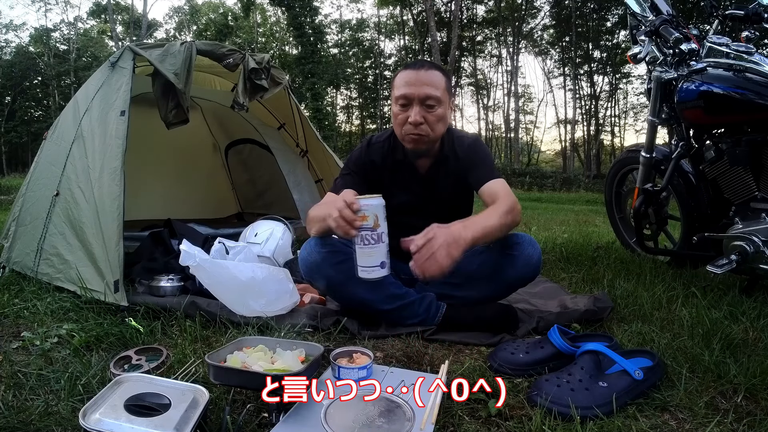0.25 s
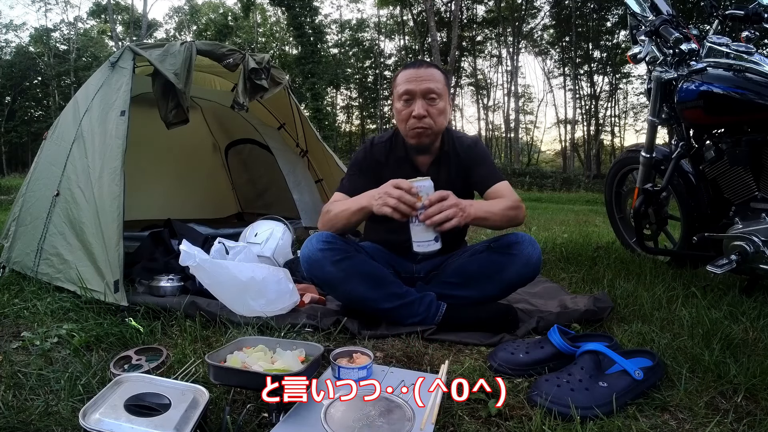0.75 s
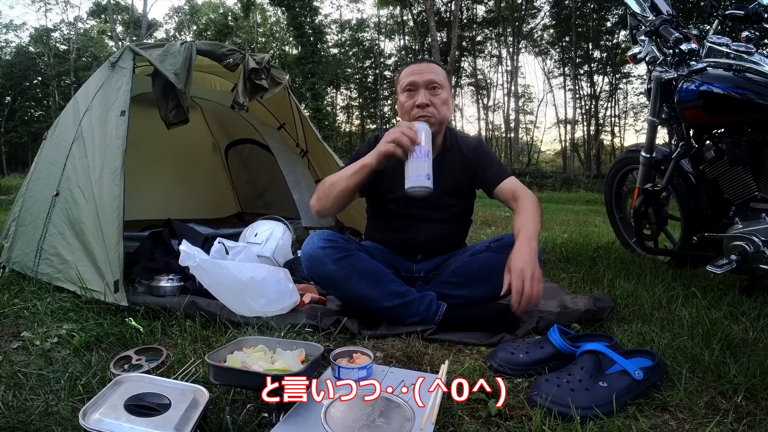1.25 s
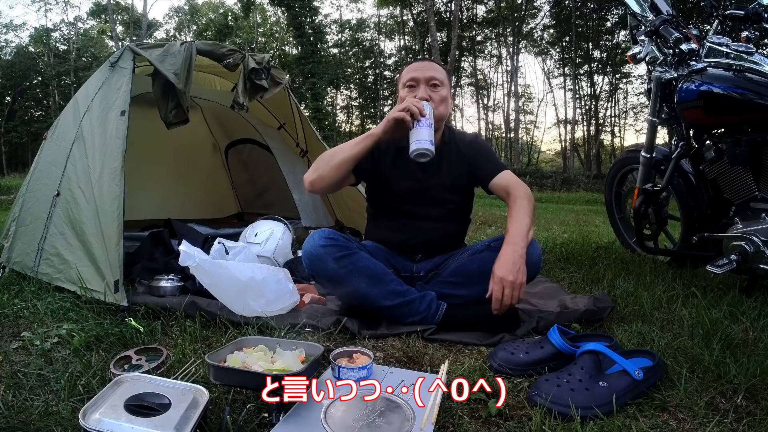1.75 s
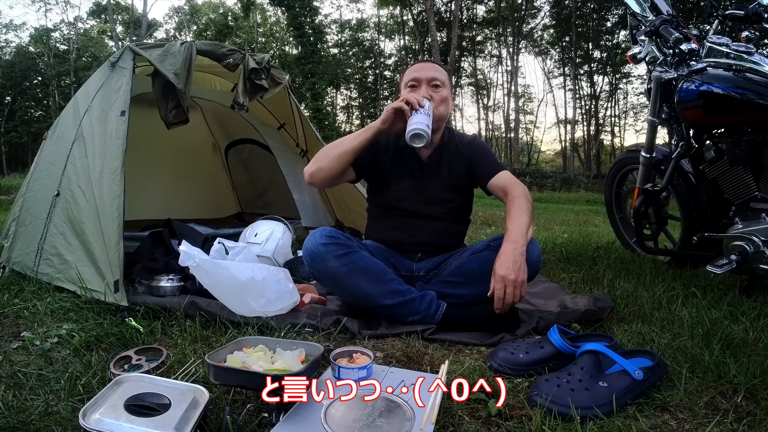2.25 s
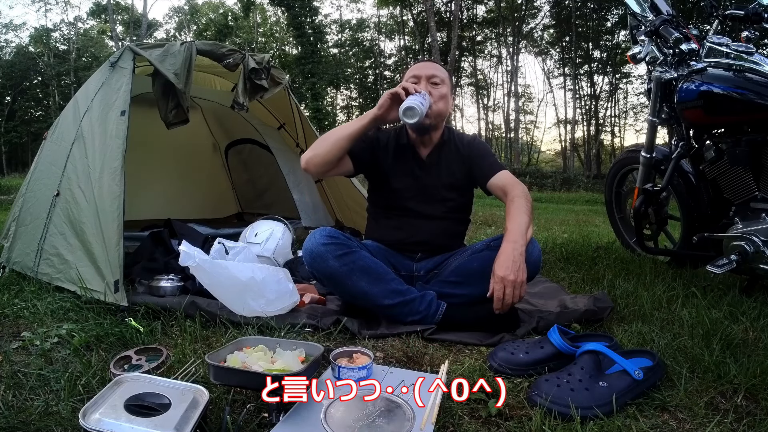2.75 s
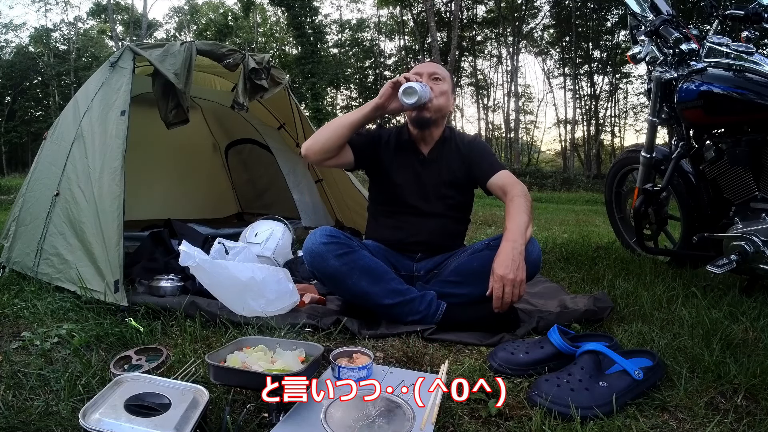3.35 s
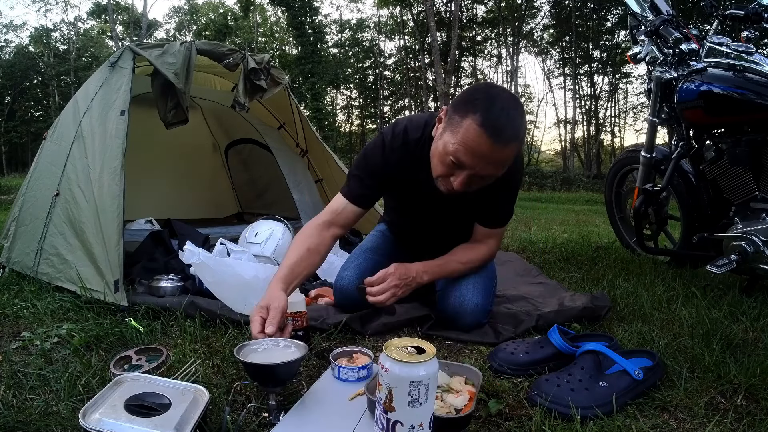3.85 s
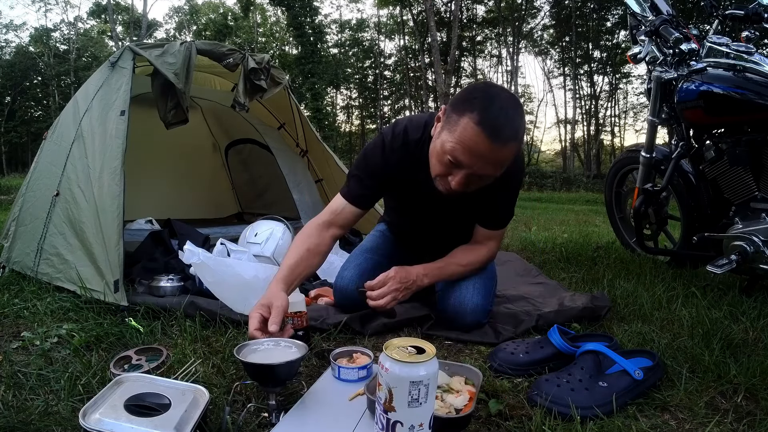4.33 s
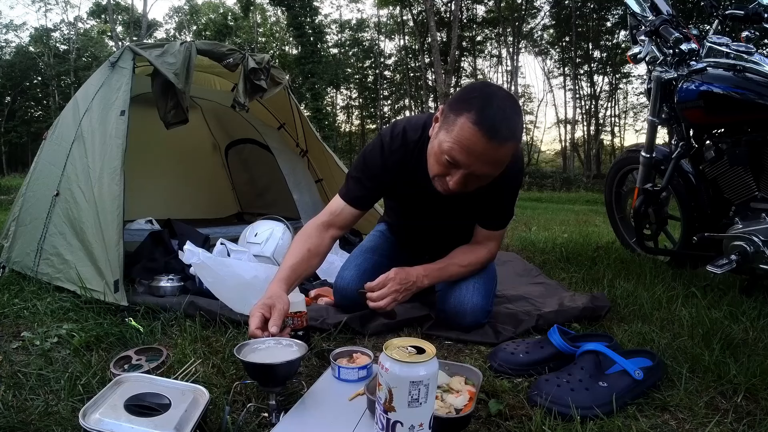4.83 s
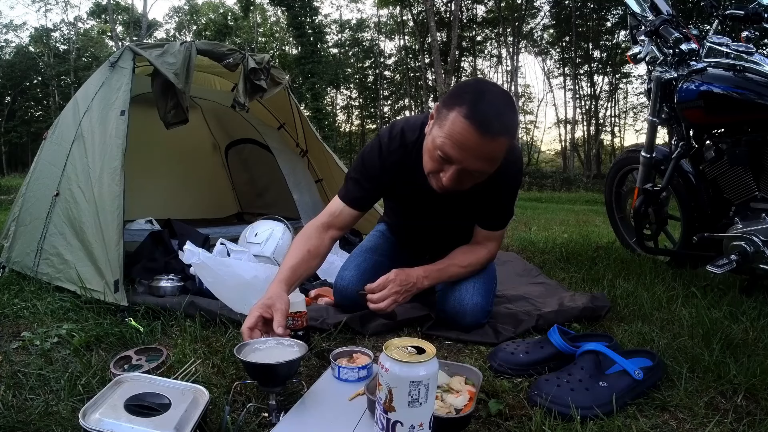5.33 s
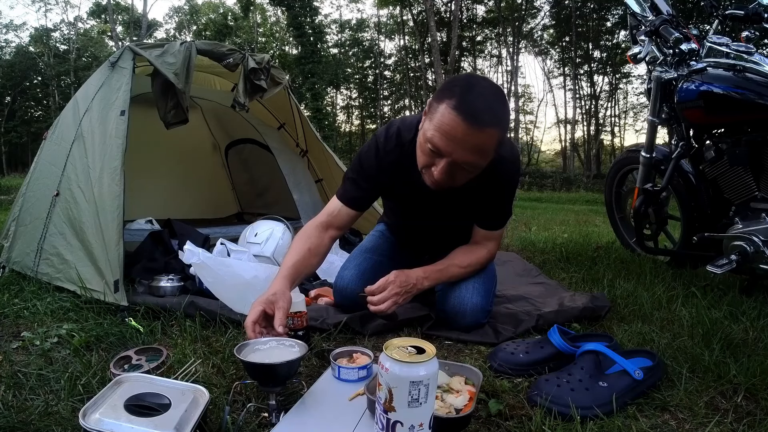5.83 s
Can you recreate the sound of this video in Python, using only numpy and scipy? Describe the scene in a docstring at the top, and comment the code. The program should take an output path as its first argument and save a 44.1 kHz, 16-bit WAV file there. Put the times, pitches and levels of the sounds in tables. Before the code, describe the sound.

A camp stove burns in open air, heard by two nearby microphones, the right one duller. First comes a dense, bright roar with irregular small cracks and short metallic pings from the pot, a brief tinny can knock and one fizzing snap. Then an abrupt cut clicks into a far quieter hiss, with low fluttering flame puffs and faint wind.

```python
"""Camping gas burner, high then low

Outdoors, a burner roars at full gas under a pot that sputters, snaps and pings; a drink can is knocked.
After a hard cut, which clicks, it hisses softly, turned down, and the low flame puffs in moving air.
Roar, hiss, cracks and puffs are shaped noise; pot and can are sums of dying sine waves.
Two sound ports hear it. The right one is shaded: dull in the treble and late.
"""
import sys
import numpy as np
from scipy import signal
from scipy.fft import rfft, irfft, next_fast_len
from scipy.io import wavfile
from scipy.ndimage import uniform_filter1d, map_coordinates

SR = 44100
rng = np.random.default_rng(int(sys.argv[2]) if len(sys.argv) > 2 else 0)


def voltage_ratio(level):
    """Linear amplitude factor for a level in decibels (scalar or array-like)."""
    return 10 ** (np.asarray(level, float) / 20)


def dump_mix(stems):
    """Bounce the given channels to the path in sys.argv[1] as a 16-bit WAV at rate SR."""
    frames = np.atleast_2d(stems).T  # one column per channel
    limited = np.clip(frames, -1, 1)  # hard clip at full scale
    pcm = np.round(limited * 32767).astype(np.int16)
    wavfile.write(sys.argv[1], SR, pcm)


N = 268216  # length in samples

# Tone colour of full gas at each port, before each range gets its own level: pitch_hz, density_db
FULL_LEFT = [(25, -97.5), (60, -94.5), (150, -95), (300, -93.5), (600, -87.5), (1000, -81.5), (2000, -83),
             (3300, -73.5), (4000, -76.5), (6000, -85), (8000, -94.5), (9000, -102.9), (9400, -116),
             (9750, -147.6), (10500, -142.9)]
FULL_RIGHT = [(25, -102), (60, -90), (150, -94.5), (300, -98.5), (600, -90.5), (1000, -83), (2000, -82),
              (3300, -76.5), (4000, -89), (6000, -101.4), (8000, -109.0), (9000, -124.5), (9700, -138.7),
              (10500, -144.9)]
# Resonances of pot and windshield at each port: pitch_hz, width_hz, height_db
FULL_LEFT_PEAKS = [(347, 310, 19), (760, 134, 13.5), (1120, 290, 6.5), (1470, 94, 8), (1940, 210, 9),
                   (2880, 830, 0.5), (3060, 63, 4), (3420, 190, -7), (5120, 800, 6), (6850, 2000, 7),
                   (7480, 360, 2.5)]
FULL_RIGHT_PEAKS = [(347, 260, 15), (744, 230, 15.5), (1055, 180, 6.5), (1366, 230, 6), (1830, 310, 7),
                    (2884, 1130, 8), (3130, 57, 2), (3260, 400, -2), (4980, 700, 14.5), (6500, 240, 7.5),
                    (8200, 75, 3)]
# Gap between the rumble and the pot resonance: pitch_hz, width_hz, height_db
FULL_DIP = [(550, 120, -13)]
# How alike the two ports sound: pitch_hz, likeness_0_to_1
FULL_ALIKE = [(40, 0.5), (120, 0.63), (300, 0.94), (480, 0.7), (750, 0.91), (1600, 0.95), (2300, 0.6),
              (3000, 0.87), (3700, 0.58), (4000, 0.37), (5000, 0.4), (5600, 0.9), (6500, 0.4), (7600, 0.8)]
# How far the left port leads: pitch_hz, lead_radians
FULL_LEAD = [(100, 0), (700, .15), (1290, .45), (2150, 1.1), (2670, 1.6), (3360, 2.6), (3800, 2.9),
             (4700, 3.1), (5300, 4.5), (5800, 8.7), (7000, 9.3)]
# Depth of the loud and soft patches heard at the left port, then at the right: pitch_hz, depth_db
FULL_PATCHES = [(60, 3), (350, 2.5), (550, 4), (700, 1.4), (7000, 1.6), (9000, 6)], [(60, 3), (350, 2.5),
                (550, 4), (700, 1.4), (3600, 1.5), (4500, 3.5), (6500, 7)]
# Borders between wind, rumble and jet: pitch_hz
FULL_SPLITS = [120, 480]
# Level of the flame's rumble: time_s, level_db
FULL_RUMBLE = [(0, -62.5), (.2, -62), (.3, -55), (.45, -57.5), (.52, -60), (.6, -51), (.95, -54),
               (1.1, -61), (1.28, -58), (1.4, -53), (1.64, -54), (1.73, -62), (1.82, -53), (2.02, -57),
               (2.3, -61.5), (2.45, -54), (2.75, -53), (2.9, -51), (3.25, -60.5), (3.45, -55.5),
               (3.78, -53.5)]


def full_gas():
    """A strong jet roars as noise; the cracks of the sputters pass through the same resonances."""
    jet = rng.standard_normal((2, N)) + voltage_ratio(-10.0) * sizzle(rate=82, spread_db=-1.0, decay_s=0.0052)
    cracks, rings = sputters()
    source = unit(jet) + cracks
    left = FULL_LEFT, FULL_LEFT_PEAKS + FULL_DIP
    right = FULL_RIGHT, FULL_RIGHT_PEAKS + FULL_DIP
    heard = patchy(ports(source, left, right, FULL_ALIKE, FULL_LEAD), FULL_PATCHES, size=(3, 6))
    rumble_db = waver(*curves(FULL_RUMBLE), depth_db=1.5)
    # the valve holds the jet nearly steady; it grows by 0.3 dB per second
    jet_db = waver(-38.2 + 0.3 * np.arange(N) / SR, depth_db=0.25)
    roar = set_levels(heard, [wind_db(), rumble_db, jet_db], FULL_SPLITS)
    return roar + filtered(rings, lambda hz: above(hz, 460))


# Sputters in the pot: crack peaks over the plain jet noise before its colour, and rings before their
# low cut: start_s, dull_crack_db, bright_crack_db, deep_ring_db, high_ring_db
SPUTTERS = [(.224, -3, -2, -56, -33.5), (.261, -0.5, -1.5, -52, -29), (.379, 7, 13.5, -60, -29),
            (.483, 10.5, -7, -65, -34), (.568, 4, 13, -60, -60), (.688, 6, 15.5, -60, -44),
            (.867, 6.5, 7.5, -40, -33), (1.0, 3, 3, -54, -59), (1.14, 6, 14, -55, -32),
            (1.332, 3, 3, -55, -45), (1.357, 3.5, 6, -51, -44), (1.374, -2.5, 0, -64, -32),
            (1.436, -9, -7.5, -55, -48), (1.592, -1, -13, -56, -31), (1.755, 7.5, -4, -64, -30.5),
            (1.792, -1.5, 4, -62, -31), (1.841, 4.5, 3, -71, -40), (1.986, -6, -9.5, -58, -49),
            (2.003, 6, -8.5, -62, -30.5), (2.115, -13, -5.5, -48.5, -30), (2.425, 4.5, -2, -57, -55),
            (2.606, -3, -3.5, -57, -35.5), (2.695, 0, -10, -66, -38), (2.84, 1, 3, -60.5, -32.5),
            (2.957, -2, -0.5, -60, -33), (3.071, -8, 0.5, -63, -37), (3.087, 10.5, -2.5, -53, -35),
            (3.202, -3.5, -3, -55, -32), (3.2207, 7, -1, -50, -23.5), (3.445, -5, -8, -55, -38),
            (3.502, -4, -3.5, -58, -30.5), (3.762, -10, -4.5, -56, -37)]
# The dull and the bright part of a crack: pitch_hz, sharpness (no unit), decay_s
CRACKS = [(1750, 2, .0016), (5000, 1.8, .0026)]
# Deep and high ring of the pot: pitch_hz, time_to_fall_60_db_s
POT = [(519, 0.17), (755, 0.065)]


def sputters():
    """Each sputter is a dull and a bright crack of noise, and it sets two tones of the pot ringing."""
    cracks = np.zeros((2, N + SR))  # spare room for the last tails
    rings = np.zeros(N + SR)
    for start_s, dull_db, bright_db, deep_db, high_db in SPUTTERS:
        at = round(start_s * SR)
        for (hz, sharpness, decay_s), db in zip(CRACKS, (dull_db, bright_db)):
            crack = voltage_ratio(db) * burst(decay_s, hz, sharpness)
            cracks[:, at:at + crack.shape[1]] += crack
        for (hz, t60), db in zip(POT, (deep_db, high_db)):
            rings[at:at + SR // 5] += ring(hz, db, t60, attack_s=0.00046)
    return cracks[:, :N], rings[:N]


def burst(decay_s, centre_hz, sharpness):
    """A crack: fading noise sent through a narrow resonance, scaled to peak 1."""
    t = np.arange(SR // 20) / SR
    noise = rng.standard_normal((2, len(t))) * np.exp(-t / decay_s)
    noise[0, 0] = 2.5  # sharp front in the source that both ports share
    crack = signal.lfilter(*signal.iirpeak(centre_hz, sharpness, SR), noise)
    return crack / np.abs(crack).max()


def sizzle(rate, spread_db, decay_s):
    """Countless small bubbles (rate per second): each lifts the noise briefly, by differing amounts."""
    strength = voltage_ratio(spread_db * np.minimum(rng.exponential(size=N), 2.5))
    starts = (rng.random(N) < rate / SR) * strength
    fade = np.exp(-2 * np.arange(SR // 20) / SR / decay_s)  # fade of the power
    swell = signal.fftconvolve(starts ** 2, fade)[:N]
    return unit(np.sqrt(np.abs(swell)) * rng.standard_normal((2, N)))


# Tone colour of low gas at each port, before each range gets its own level: pitch_hz, density_db
LOW_LEFT = [(25, -100.4), (60, -88.5), (150, -99.5), (300, -100.3), (600, -100.7), (1000, -94.5),
            (2000, -92), (3300, -99.5), (4000, -97.5), (6000, -100.5), (8000, -101.7), (9000, -124.3),
            (9400, -134), (9750, -151.5), (10500, -142.8)]
LOW_RIGHT = [(25, -101), (60, -93.5), (150, -94), (300, -106.5), (600, -99.4), (1000, -96), (2000, -84),
             (3300, -88.5), (4000, -103.4), (6000, -102.5), (8000, -122.0), (9000, -116.8), (9700, -135.8),
             (10500, -143.3)]
# Resonances at each port with the gas turned down: pitch_hz, width_hz, height_db
LOW_LEFT_PEAKS = [(341, 240, 13), (1030, 150, 2.1), (1480, 136, 12.4), (1794, 71, 11), (2280, 87, 9.1),
                  (2650, 97, 4.2), (3030, 760, 8), (3617, 255, 14), (4000, 130, 8), (4830, 300, 7.3),
                  (5040, 98, 12.5), (5130, 85, -2), (5530, 160, 5.9), (6310, 170, 9), (7310, 930, 14),
                  (7600, 260, 2.5), (7950, 200, -4.5), (8640, 630, 17)]
LOW_RIGHT_PEAKS = [(340, 166, 11), (1063, 56, 7.8), (1414, 165, 10), (1850, 390, 5.9), (2550, 360, 7.1),
                   (2960, 480, 10.8), (3544, 43, 15), (4680, 240, 7), (5340, 150, 5.7), (5300, 170, 2.0),
                   (7415, 750, 5.2), (7800, 90, 13)]
# Gap between the rumble and the murmur: pitch_hz, width_hz, height_db
LOW_DIP = [(700, 400, -3)]
# How alike the two ports sound: pitch_hz, likeness_0_to_1
LOW_ALIKE = [(40, 0.35), (280, 0.91), (1300, 0.7), (2300, 0.22), (3300, 0.26), (4200, 0.027)]
# How far the left port leads: pitch_hz, lead_radians
LOW_LEAD = [(100, 0), (1200, -.1), (2100, .4), (2700, .9), (3800, 2.1)]
# Depth of the loud and soft patches heard at the left port, then at the right: pitch_hz, depth_db
LOW_PATCHES = [(100, 3), (400, 3), (700, .6), (1100, 2.5), (2000, 3), (4300, 2.8), (5000, 2), (6000, 3.4),
               (7500, 1.5), (9000, 5)], [(100, 3), (400, 2.5), (700, .6), (1100, 3), (1500, 2), (3000, 2),
               (5200, 2.4), (6500, 2), (8000, 6)]
# Borders between wind, rumble, floor, murmur, jet, treble and top: pitch_hz
LOW_SPLITS = [120, 560, 960, 1250, 3850, 6800]
# Level of the flame's rumble: time_s, level_db
LOW_RUMBLE = [(3.8, -56), (4.04, -61.5), (4.2, -69.5), (4.6, -61), (5.0, -62.5), (5.3, -62.5),
              (6.08, -62.5)]
# Level of the murmur under the pot and of the jet's treble: time_s, murmur_db, treble_db
LOW_DRIFT = [(3.8, -65, -57), (3.95, -67, -59.5), (4.12, -71, -61.5), (4.2, -70, -65), (4.35, -65, -60),
             (4.5, -68, -64.5), (4.62, -64, -60.5), (4.76, -62, -60.5), (4.85, -74, -62),
             (4.95, -58, -62.5), (5.13, -70, -60.5), (5.35, -63, -60.5), (5.55, -68.5, -59.5),
             (5.68, -68, -60.5), (5.76, -67, -62.5), (5.92, -63, -62), (6.08, -63, -61.5)]


def low_gas():
    """A thin steady jet hisses as noise; long narrow loud and soft patches are heard in it."""
    jet = rng.standard_normal((2, N)) + voltage_ratio(-9.5) * sizzle(rate=71, spread_db=-6.5, decay_s=0.0098)
    left = LOW_LEFT, LOW_LEFT_PEAKS + LOW_DIP
    right = LOW_RIGHT, LOW_RIGHT_PEAKS + LOW_DIP
    heard = patchy(ports(jet, left, right, LOW_ALIKE, LOW_LEAD), LOW_PATCHES, size=(3, 14))
    calmer_wind_db = wind_db() - 1
    rumble_db = waver(*curves(LOW_RUMBLE), depth_db=1)
    murmur_db, treble_db = curves(LOW_DRIFT)
    murmur_db = waver(murmur_db, depth_db=1)
    jet_db = waver(-50, depth_db=0.37)
    treble_db = waver(treble_db, depth_db=1)
    floor_db, top_db = -72, -62  # steady ranges under the murmur and over the treble
    levels_db = [calmer_wind_db, rumble_db, floor_db, murmur_db, jet_db, treble_db, top_db]
    return set_levels(heard, levels_db, LOW_SPLITS) + puffs()


# Puffs of the low flame; the peak lies midway between the ports:
# start_s, peak_db, first_pitch_hz, last_pitch_hz, left_over_right_db, length_s
PUFFS = [(4.091, -56, 253, 250, 5, 0.036), (4.511, -55, 347, 372, 2, 0.044),
         (4.592, -50.5, 300, 257, 9, 0.045), (4.755, -46, 140, 115, 11, .06), (4.73, -54, 360, 440, 5, .09),
         (4.91, -46, 380, 300, 3.5, 0.08), (5.035, -54, 220.5, 178, 5, 0.072),
         (5.02, -57, 503, 440, 11, 0.057), (5.165, -52.5, 476, 369, -7, 0.086),
         (5.35, -49, 280, 390, 6.5, 0.11), (4.973, -50.5, 250, 220, 6, 0.04),
         (5.539, -52, 398, 363, 7, 0.069), (5.57, -46, 130, 150, 7, .08), (5.57, -47, 260, 220, 7, .08),
         (5.575, -48, 200, 180, 7, .07), (5.702, -50, 330, 234, 8, 0.088),
         (5.789, -55, 310, 209, 12, 0.073), (5.8, -59, 437, 587, 13, 0.075),
         (5.939, -52.5, 398, 390, 9, 0.11)]


def puffs():
    """Moving air makes the flame puff: a soft swell of narrow noise and hum whose pitch slides."""
    out = np.zeros((2, N))
    t = np.arange(-SR // 4, SR // 4) / SR  # zero at the middle of the puff
    for start_s, db, first_hz, last_hz, pan_db, length in PUFFS:
        band_hz = 0.35 * (first_hz + last_hz) / 2
        span = int(SR / band_hz)
        slow = uniform_filter1d(rng.standard_normal((2, len(t))), span)
        a, b = unit(uniform_filter1d(slow, span // 2))
        hz = np.interp(t, [-length / 2, length / 2], [first_hz, last_hz])
        turn = 2 * np.pi * np.cumsum(hz) / SR
        hum = 1.1  # steady tone beside noise of rms 1
        puff = (a + hum) * np.cos(turn) + b * np.sin(turn)
        puff = puff * np.exp(-(2 * t / length) ** 2)
        puff = puff / np.abs(puff).max()
        gains = voltage_ratio(db + pan_db * np.array([[.5], [-.5]]))
        at = round((start_s + length / 2) * SR) - SR // 4
        out[:, at:at + len(t)] += (gains * puff)[:, :N - at]
    return out


# Tick of the snap, levels over the snap's own level: pitch_hz, level_db, time_to_fall_60_db_s
SNAP_TICK = [(1150, 6, .01), (1900, 9, .008), (4600, 5, .009)]


def snap():
    """A drop bursts on hot metal: a bright fizz swells into a short dull tick."""
    peak_s, snap_db = 2.2905, -27
    pitch_hz, width_hz, rise_s, fall_s = 5500, 3800, .0016, .0028
    t = np.arange(N) / SR - peak_s
    band = lambda hz: np.exp(-(2 * (hz - pitch_hz) / width_hz) ** 2)
    fizz = voltage_ratio(snap_db) * unit(filtered(rng.standard_normal(N), band))
    fizz = fizz * np.exp(-np.abs(t) / np.where(t < 0, rise_s, fall_s))
    tick = np.zeros(N)
    at = round((peak_s - rise_s / 2) * SR)
    tick[at:at + SR // 5] = sum(ring(hz, snap_db + db, t60, attack_s=.0006) for hz, db, t60 in SNAP_TICK)
    return fizz * voltage_ratio(np.array([[4], [-8]])) + tick  # the shaded port hears little of the fizz


# Tones of the can, levels over the knock's own level: pitch_hz, level_db, time_to_fall_60_db_s
CAN = [(517, 0, 0.095), (740, 4.5, 0.022), (1040, -1, 0.022), (1276, -8, 0.035), (1900, -5, .025),
       (2300, -1, 0.03), (2650, -8, .025), (4764, -12, 0.045), (5400, -2, .018), (6250, -11, .014)]


def can():
    """Fingers knock a drink can; its thin metal wall rings in many short tones."""
    start_s, knock_db = .568, -22.5  # level before the soft start and the band limits
    out = np.zeros(N)
    at = round(start_s * SR)
    for k, (hz, db, t60) in enumerate(CAN):
        direction = (-1) ** k  # neighbours start in opposite directions
        out[at:at + SR // 5] += direction * ring(hz, knock_db + db, t60, attack_s=.0008)
    return filtered(out, lambda hz: above(hz, 420) * (1 - above(hz, 7500)))


def ring(hz, db, t60, attack_s):
    """One tone of struck metal: a sine with a quick soft start that falls 60 dB in t60 seconds."""
    t = np.arange(SR // 5) / SR
    return voltage_ratio(db - 60 * t / t60) * (1 - np.exp(-t / attack_s)) * np.sin(2 * np.pi * hz * t)


# Gusts on the ports: peak_s, rise_db, length_s
GUSTS = [(1.72, 8, 0.07), (2.05, 11, 0.2), (2.294, 7, 0.14), (2.61, 9.5, 0.072), (2.94, 12, 0.1),
         (3.505, 11, 0.21), (4.787, 9, 0.071), (5.24, 7, 0.081), (5.622, 8, 0.19)]


def wind_db():
    """Level of a restless breeze on the ports; each gust swells and fades evenly."""
    t = np.arange(N) / SR
    breeze_db = waver(-70, depth_db=3.5)
    return breeze_db + sum(db * np.exp(-(2 * (t - s) / length) ** 2) for s, db, length in GUSTS)


def waver(level_db, depth_db):
    """A level in dB that drifts up and down at random, through 7 smoothly joined points a second."""
    per_s = 7
    knots = rng.standard_normal(int(N * per_s / SR) + 4)
    return level_db + depth_db * map_coordinates(knots, [np.arange(N) * per_s / SR])


def ports(pair, left, right, alike, lead):
    """Two unrelated sources at two ports: the right one shares the first in part, shifted in phase."""
    def response(hz):
        left_db, right_db = colour_db(*left, hz), colour_db(*right, hz)
        share = np.clip(along(alike, hz), 0, 1)
        to_left = causal(left_db)
        to_right = to_left * voltage_ratio(right_db - left_db) * np.exp(-1j * along(lead, hz))
        own = np.sqrt(1 - share ** 2)
        return np.array([[to_left, 0 * hz], [to_right * share, to_right * own]])
    return filtered(pair, response).sum(axis=1)


def colour_db(slope, peaks, hz):
    """A slope with resonant humps (or dips) on it."""
    return along(slope, hz) + sum(db / (1 + (2 * (hz - c) / w) ** 2) for c, w, db in peaks)


def causal(db):
    """The response of this level whose ringing follows the blow (folded cepstrum)."""
    c = irfft(db * np.log(10) / 20)
    c[1:len(c) // 2] *= 2
    c[len(c) // 2 + 1:] = 0
    return np.exp(rfft(c))


def patchy(pair, depths, size):
    """The gain wanders in patches of pitch and time, size = (frequency bins, time frames)."""
    hz, _, z = signal.stft(pair, SR, nperseg=512)
    field = rng.standard_normal(z.shape[1:])
    field = uniform_filter1d(field, size[0], axis=0)
    field = unit(uniform_filter1d(field, size[1], axis=1))
    depth_db = np.array([along(d, hz) for d in depths])[..., None]
    even = np.exp(-(depth_db * np.log(10) / 20) ** 2)  # keeps the mean power
    return signal.istft(z * voltage_ratio(depth_db * field) * even, nperseg=512)[1][:, :N]


def set_levels(heard, levels_db, splits):
    """Cuts the sound into pitch ranges; the mean of the ports in each range follows its own level."""
    def shares(hz):
        borders = [1 + 0 * hz, *(above(hz, s) for s in splits), 0 * hz]
        return -np.diff(borders, axis=0)[:, None]
    layers = filtered(heard, shares)
    return sum(voltage_ratio(db) * x / np.std(x.mean(axis=0)) for db, x in zip(levels_db, layers))


def above(hz, split_hz):
    """Share of each frequency that lies over a split."""
    return 1 / (1 + (split_hz / (hz + 1)) ** 10)


def filtered(x, response):
    """x times a response (complex or plain) of frequency."""
    m = 2 * next_fast_len(N // 2 + 4096)
    return irfft(rfft(x, m) * response(np.fft.rfftfreq(m, 1 / SR)), m)[..., :N]


def along(points, hz):
    """(pitch_hz, value) points read on a log axis."""
    f, v = np.transpose(points)
    return np.interp(np.log(hz + 1), np.log(f + 1), v)


def curves(rows):
    """One value per sample for each column after the time."""
    s, *cols = np.transpose(rows)
    return [np.interp(np.arange(N) / SR, s, c) for c in cols]


def unit(x):
    """Scale to rms 1."""
    return x / np.sqrt(np.mean(x ** 2) + 1e-30)


def scene():
    """Full gas up to the cut, low gas after it; a one-sample jump at the splice clicks."""
    cut_s = 3.7893
    before = full_gas() + can() + snap()
    out = np.where(np.arange(N) < cut_s * SR, before, low_gas())
    out[:, round(cut_s * SR)] -= voltage_ratio(np.array([-33.5, -35.5]))  # left and right
    return out


def low_pass(x):
    """Removes everything above the highest recorded frequency."""
    return signal.sosfilt(signal.butter(12, 15720, fs=SR, output="sos"), x)


def record(dry):
    """Adds a faint noise floor above 9300 Hz."""
    hiss = rng.standard_normal((2, N))
    floor = voltage_ratio(-92) * filtered(hiss, lambda hz: above(hz, 9300))
    return low_pass(dry + floor)


dry = scene()
out = record(dry)
dump_mix(out)
```